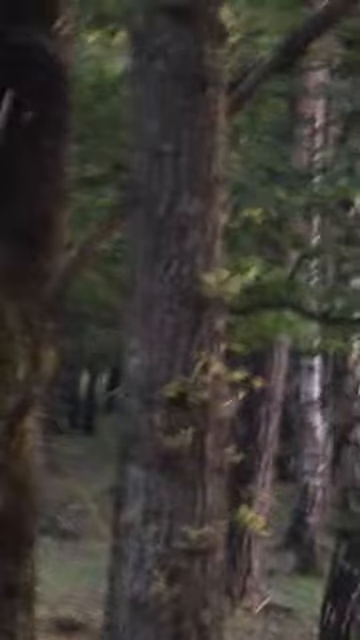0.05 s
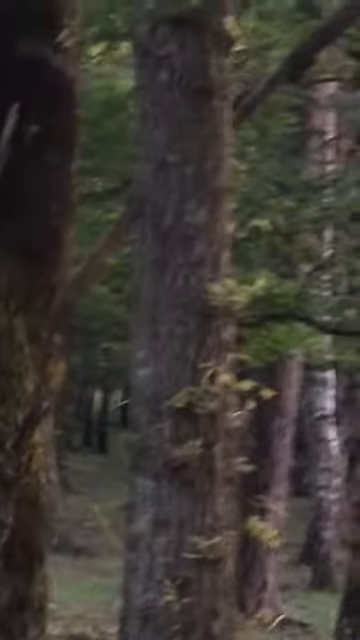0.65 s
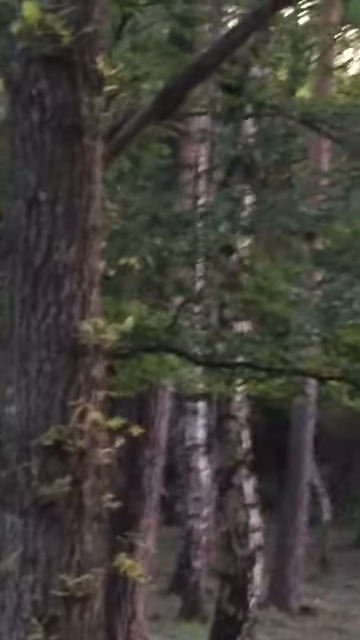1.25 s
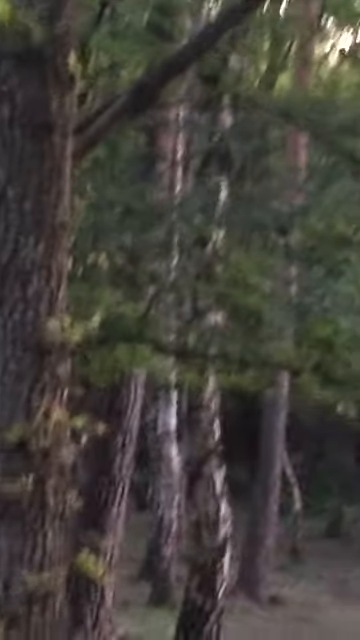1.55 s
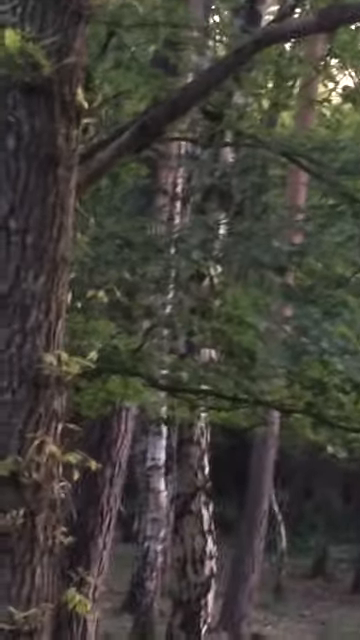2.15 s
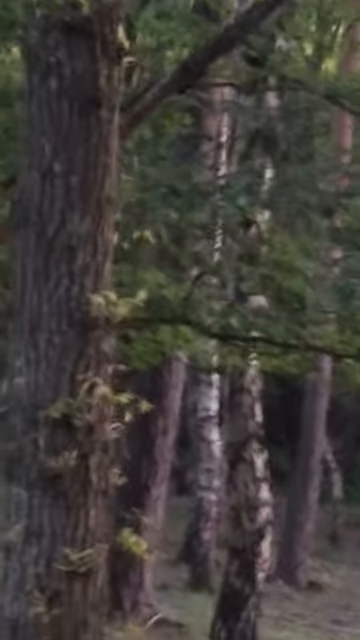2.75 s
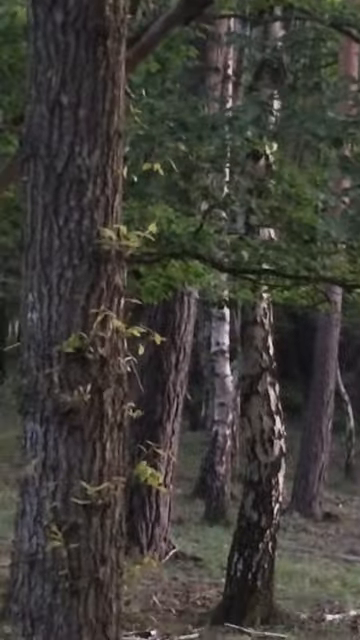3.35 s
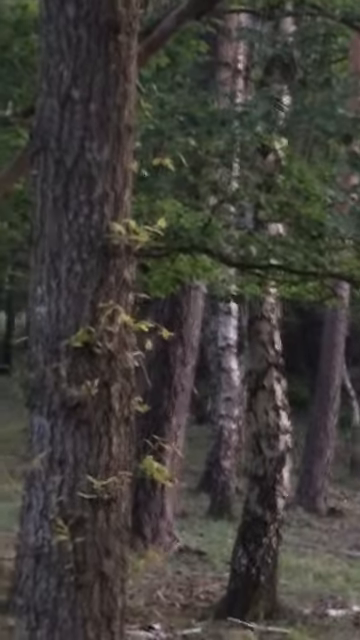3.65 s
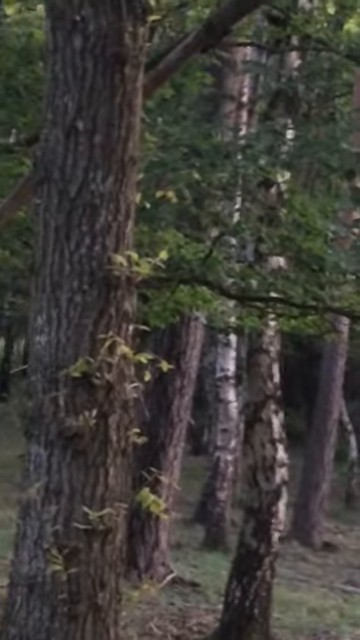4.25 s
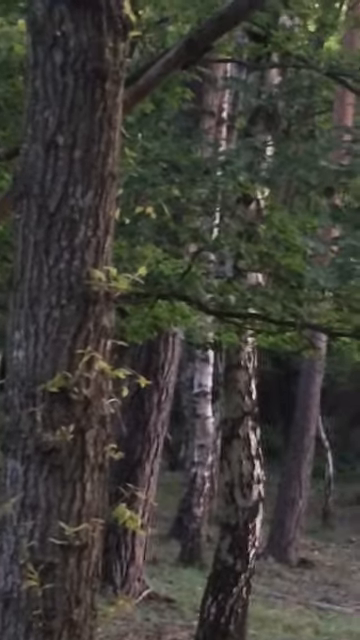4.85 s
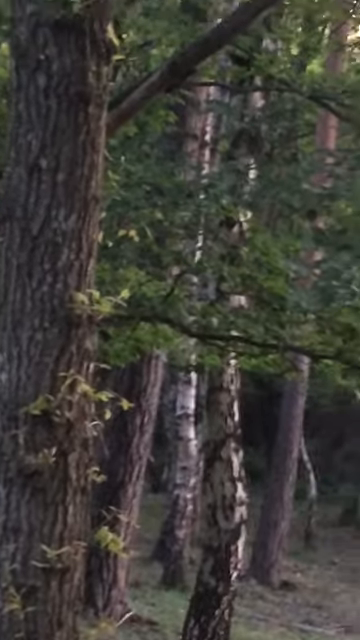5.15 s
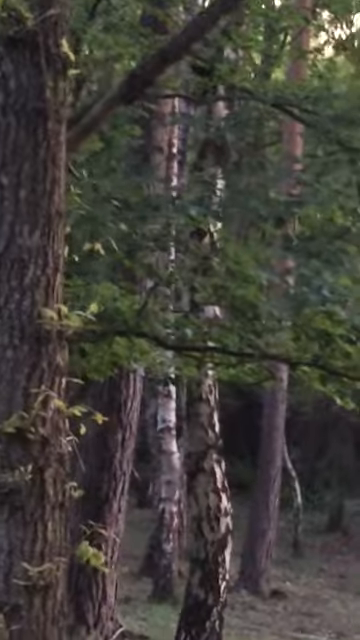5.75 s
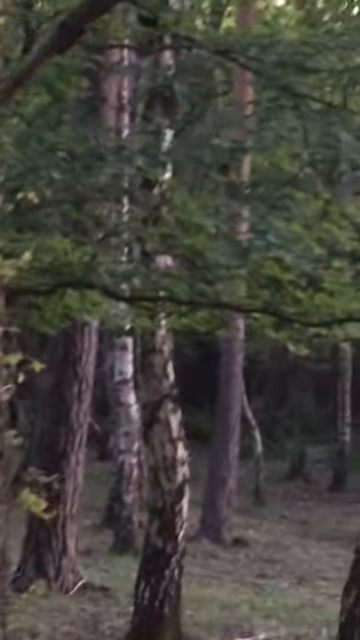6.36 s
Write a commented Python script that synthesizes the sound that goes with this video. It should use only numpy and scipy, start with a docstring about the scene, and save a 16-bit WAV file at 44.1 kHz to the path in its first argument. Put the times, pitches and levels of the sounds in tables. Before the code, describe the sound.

A deer squeaks once, high and echoing, after some close handling clicks, while small birds sing faintly far off.

```python
"""A deer's alarm squeak

In a quiet wood a deer squeaks once: its voice breaks upward, arches and falls away among echoing trunks.
Before that, fingers click and rub on a camera's housing; the hand that holds it makes soft, low bumps.
Small birds sing far off over a faint, distant rumble."""
import sys
import numpy as np
from scipy import signal
from scipy.fft import rfft, irfft, next_fast_len
from scipy.io import wavfile
from scipy.ndimage import map_coordinates

SR = 44100
rng = np.random.default_rng(int(sys.argv[2]) if len(sys.argv) > 2 else 0)


def digitize_waveform(pressure):
    """Quantize a signal to 16-bit integers and store it at the path in sys.argv[1].

    Rows of a 2-D input are taken as channels; values are limited to [-1, 1].
    """
    field = np.atleast_2d(pressure).T
    bounded = np.clip(field, -1, 1)
    quanta = np.round(bounded * 32767).astype(np.int16)
    wavfile.write(sys.argv[1], SR, quanta)


N = 291060

# how the far rumble rises and sinks: t/s, relative level/dB
RUMBLE_LEVELS = [(0, -63), (1.2, -65), (2.2, -64.5), (3.3, -63.5), (5.6, -63.5), (6.6, -64.5)]
# the tone colour of each noise: f/Hz, relative level/dB
RUMBLE_COLOUR = [(20, -15), (45, 3), (65, -2), (115, 2), (160, -7), (280, -10.5), (450, -5), (600, -8),
                 (720, -2.5), (1000, -11), (1400, -18), (2000, -24), (3200, -35), (7000, -54)]
HISS_COLOUR = [(1500, -11), (3000, 2), (6000, 1), (10000, -3), (15000, -4)]
SCUFF_COLOUR = [(60, 7.5), (170, 2), (300, -9), (700, -36), (2000, -74)]  # skin shifting on the camera
SKIN_COLOUR = [(600, -13), (2200, 5.5), (4000, 3), (6000, 0), (8000, 0), (13000, -0.5), (15500, -5)]  # a sliding fingertip
SNAP_COLOUR = [(300, -21), (600, -18.5), (1200, -7.5), (1800, -6), (2700, -12), (3600, 0.5), (4900, 0.5),
               (5600, -8.5), (6300, -2), (8300, -1), (10000, -12), (13000, -10), (15500, -20)]  # a finger click
HOLLOW_COLOUR = [(400, -8.5), (900, -12.5), (1600, -3.5), (2400, 1.5), (3200, -11), (5000, -8.5),
                 (9000, -24.5), (15000, -24)]  # the housing's many small resonances
RASP_COLOUR = [(900, -13), (1400, -17), (2500, -5.5), (3200, 16), (4000, -41), (5000, -12), (5600, -11.5),
               (6700, 5), (8500, -28), (10000, -27.5), (15000, -35.5)]  # air in the deer's throat

# how long the wood echoes (t60 is the time to fade by 60 dB): f/Hz, t60/s
ECHO_TIMES = [(500, 0.96), (2500, 1.6), (3300, 1.49), (6500, 0.78), (13000, 1)]
# how well the wood returns sound: f/Hz, gain/dB
ECHO_COLOUR = [(1200, 7.5), (2450, 3.5), (3200, -3), (5000, 6.5), (6600, 5), (10000, -0.5)]

# far warbles and single bird whistles: t/s, length/s, start f/Hz, end f/Hz, level/dB
WARBLES = [(0, .25, 3980, 4230, -79), (1.081, 0.97, 3750, 3255, -78), (3.299, 0.1, 6980, 5980, -83.5),
           (3.45, 0.087, 6650, 6720, -75), (3.75, 0.13, 3200, 2970, -70), (6.331, 0.23, 3870, 3830, -72)]
BIRD_WHISTLES = [(3.574, 0.052, 6000, 3950, -72.5), (3.64, .057, 4000, 3340, -76),
                 (3.704, 0.038, 2670, 2750, -73), (4.873, 0.044, 2920, 2844, -64.5),
                 (5.261, 0.069, 2705, 2900, -70.5), (5.425, 0.057, 5500, 3990, -72.5),
                 (5.666, 0.036, 2720, 2545, -70.5), (5.706, 0.061, 2884, 2750, -67.5),
                 (5.89, 0.052, 4180, 4120, -64.5)]
# a songbird's three syllables: t/s into the syllable, f/Hz, relative level/dB
LILT = [(0, 3800, -11), (.022, 3950, 5), (.048, 4250, -3), (.061, 4400, -22), (.073, 4350, -1),
        (.093, 3430, 7.5), (.125, 2850, -3)]
UPSWEEP = [(0, 2866, -4), (.07, 3270, -1), (.09, 3750, 0), (.104, 4320, 3.5), (.125, 4290, -4),
           (.145, 4150, -12.5)]
SLUR = [(0, 3480, -6), (.025, 3517, 4.5), (.08, 3350, 0), (.13, 3000, -6)]
# the syllables in the order they are sung, each repeated before the next
SONG = [LILT] * 4 + [UPSWEEP] * 2 + [SLUR] * 2

# dull knocks, damped if the finger stays on: t/s, level/dB, treble tilt/dB per octave, damping t60/s
KNOCKS = [(0.411, -32.5, -10, 0.16), (0.5034, -43, 6, 2.7), (2.779, -45.5, 0, 0.042)]
# the low tones of the camera's body: f/Hz, relative level/dB, t60/s
BODY_TONES = [(164, -1, .1), (217.3, -10, 0.98), (251, -4, .11), (385, -13, .4), (442.3, -3, 0.07),
              (576, 0.5, 0.024)]
# soft bumps of the hand: t/s, f/Hz, level/dB
BUMPS = [(2.285, 71, -49.5), (2.617, 49.4, -46), (2.665, 76.3, -39.5), (3.128, 83.3, -42),
         (3.431, 61.7, -41.5), (3.491, 115.6, -37.5), (4.176, 80, -45.5), (4.227, 62.7, -47.5),
         (5.372, 83.5, -42), (5.437, 68, -46), (5.486, 84, -39), (5.504, 104, -35.5), (5.578, 75, -47.5),
         (6.075, 79, -51)]
# finger strokes that start quickly and die away: t/s, t60/s, level/dB
STROKES = [(0.41, 0.2, -45), (0.49, 0.63, -65), (0.608, 0.24, -65.5), (0.688, 0.71, -54),
           (0.712, 0.19, -48), (0.76, 0.26, -59), (0.949, 0.28, -61.5), (1.142, 0.48, -61.5),
           (1.275, 0.36, -68), (1.385, 0.39, -66.5)]
# a fingertip sticks and slips, one row per tone: t/s, length/s, f/Hz, level/dB
CREAKS = [(0.7145, .014, 3400, -44.5), (0.7155, .017, 2510, -38), (0.758, .011, 4030, -43),
          (0.864, .0085, 3850, -53)]
# sharp finger clicks on the housing, each with its own loudness and brightness:
# t/s, level/dB, treble tilt/dB per octave
CLICKS = [(0.4091, -21.5, -1.5), (0.4106, -19, 1), (0.436, -31, -4), (0.504, -47.5, -1), (0.565, -53, -1),
          (0.717, -37, 7), (0.7572, -40, -4), (0.7602, -32.5, -5), (0.764, -41.5, -6), (0.799, -45, -13.5),
          (0.8665, -49.5, -5.5), (1.07, -59, -2), (1.1489, -49, 15), (1.1968, -50, 15),
          (1.4736, -53.5, -1.5), (1.5535, -58.5, 4), (1.744, -64, 6.5), (2.002, -57.5, -3)]
# the high tones of the housing: f/Hz, relative level/dB, t60/s
HOUSING_TONES = [(940, -4.5, .16), (1304, -5, .11), (1645, -2.5, 0.16), (1856, -8, .09), (2080, 4.5, 0.12),
                 (2508, -5.5, 0.24), (2901, -4.5, .17), (3500, -3.5, .13), (4027, -7.5, 0.19),
                 (4470, -5.5, 0.12), (4500, -6, .13), (4942, -5, 0.085), (6000, -18.5, .07),
                 (7660, -2.5, .064)]

# the deer's overtones: multiple of the pitch, relative level/dB in the onset, and in the whistle
OVERTONES = [(2, -20, -19), (3, -24.5, -34.5), (4, -39.5, -52)]
# low catches in its failing voice: t/s, length/s, f/Hz, level/dB
CROAKS = [(4.355, .012, 2090, -48.5), (4.370, .013, 1349, -49.5)]

CALL_S = 4.21  # when the deer starts
BREAK_S, CREST_S, GIVE_OUT_S = .0215, .067, .122  # from then: its voice jumps up, peaks, gives out
JITTER = .003  # its slight, constant unsteadiness, as a share of the pitch


def amp(db):
    """Turn decibels into a factor to multiply by."""
    return 10 ** (np.asarray(db) / 20)


def unit(x):
    """Scale a sound to an average power of 1."""
    return x / np.sqrt(np.mean(x ** 2) + 1e-20)


def along(points, hz):
    """Read between the rows of a (frequency, value) table, on a log frequency axis."""
    freqs, values = np.transpose(points)
    return np.interp(np.log(hz + 1), np.log(freqs + 1), values)


def curves(rows):
    """Turn each column after the time into one value per sample."""
    times, *columns = np.transpose(rows)
    return [np.interp(np.arange(N) / SR, times, column) for column in columns]


def wobble(rate):
    """A smooth random curve through `rate` points a second."""
    points = rng.standard_normal(int(N * rate / SR) + 4)
    return map_coordinates(points, [np.arange(N) * rate / SR])


def filtered(x, response):
    """Scale each frequency in a sound by response(hz)."""
    size = next_fast_len(len(x) + 8192)
    return irfft(rfft(x, size) * response(np.fft.rfftfreq(size, 1 / SR)), size)[:len(x)]


def noise(colour, size, tilt_db=0):
    """Coloured noise of power 1, its treble tilted by tilt_db per octave."""
    def response(hz):
        return amp(along(colour, hz) + tilt_db * np.log2(np.maximum(hz, 1500)))
    return unit(filtered(rng.standard_normal(size), response))


def fade(t, t60):
    """Die away by 60 dB every t60 seconds."""
    return np.exp(-np.log(1000) * t / t60)


def add(track, s, sound):
    """Mix a sound in at s seconds."""
    start = max(round(s * SR), 0)
    track[start:start + len(sound)] += sound[:max(N - start, 0)]


def whistle(pitch, waver, rate):
    """A pure tone that strays from its pitch by the share `waver`, `rate` times a second."""
    position = np.arange(len(pitch)) * rate / SR
    unsteady = 1 + waver * map_coordinates(rng.standard_normal(1024), [position], mode="wrap")
    return np.sin(2 * np.pi * np.cumsum(pitch * unsteady) / SR)


def trunks(x, spread_s, count):
    """Each tree trunk throws back a weak, slightly dull copy of the sound."""
    distance, strength = rng.random(count), rng.standard_normal(count)
    delays = (SR * (.004 + spread_s * distance)).astype(int)
    echoes = np.bincount(delays, strength * np.exp(-2 * distance))
    returned = signal.fftconvolve(x, echoes / np.linalg.norm(echoes))[:N]
    return filtered(returned, lambda hz: 1 / np.hypot(1, hz / 9000))


def forest(x):
    """The deep wood's smooth wash of echo; the treble dies first."""
    hz, t, bands = signal.stft(rng.standard_normal(2 * SR), SR, nperseg=256)
    dying = fade(t, along(ECHO_TIMES, hz)[:, None]) * (1 - np.exp(-t / .005))
    tail = signal.istft(bands * dying * amp(along(ECHO_COLOUR, hz))[:, None], SR, nperseg=256)[1]
    return signal.fftconvolve(x, tail / np.linalg.norm(tail))[:N]


def background():
    """A distant rumble drifts through the trees, with a faint, even hiss."""
    level_db, = curves(RUMBLE_LEVELS)
    rumble = amp(level_db + 3 + .56 * wobble(5.1)) * noise(RUMBLE_COLOUR, N)
    return rumble + amp(-78.5) * noise(HISS_COLOUR, N)


def warbling_birds(flutter_db=3.5):
    """Quick warbling from deep in the wood comes and goes, and arrives only as echo."""
    song = np.zeros(N)
    for s, length, start_hz, end_hz, db in WARBLES:
        pitch = np.linspace(start_hz, end_hz, int(length * SR))
        level = amp(db) * signal.windows.tukey(len(pitch), .3)
        add(song, s, level * whistle(pitch, waver=.06, rate=45))
    return forest(song * amp(flutter_db * wobble(18)))


def whistling_birds():
    """Thin whistles glide fast and then level off, half lost in their echo."""
    notes = np.zeros(N)
    for s, length, start_hz, end_hz, db in BIRD_WHISTLES:
        progress = np.linspace(0, 1, int(length * SR))
        pitch = end_hz + (start_hz - end_hz) * (1 - progress) ** 2
        level = amp(db) * np.sqrt(np.abs(np.sin(np.pi * progress)))
        add(notes, s, level * whistle(pitch, waver=.014, rate=320))
    return notes + amp(-5) * trunks(notes, spread_s=.08, count=60) + amp(-1.5) * forest(notes)


def songbird(start_s=5.044, period_s=.216, rise_db_per_s=13, echo_share=.35):
    """One bird sings its syllables at a steady pace, growing louder, blurred by the trees."""
    song = np.zeros(N)
    for k, syllable in enumerate(SONG):
        size = int(syllable[-1][0] * SR)
        pitch, shape_db = [curve[:size] for curve in curves(syllable)]
        elapsed = k * period_s
        db = min(-79.5 + rise_db_per_s * elapsed, -67)
        level = amp(db + shape_db) * signal.windows.tukey(size, .1)
        add(song, start_s + elapsed, level * whistle(pitch, waver=.0093, rate=360))
    echo = trunks(song, spread_s=.06, count=60)
    return np.sqrt(1 - echo_share) * song + np.sqrt(echo_share) * echo + amp(-5) * forest(song)


def hand_bumps():
    """Knocks ring low in the camera's body; shifts of the grip rock it gently with a dull scuff."""
    out, t = np.zeros(N), np.arange(SR // 2) / SR
    for s, db, tilt_db, damping in KNOCKS:
        ring = sum(amp(tone_db + tilt_db * np.log2(hz / 260)) * fade(t, t60) * np.sin(2 * np.pi * hz * t)
                   for hz, tone_db, t60 in BODY_TONES)
        add(out, s, amp(db) * (1 - np.exp(-t / .0018)) * fade(t, damping) * ring)
    for s, hz, db in BUMPS:
        width = .7 / hz  # half a bump lasts less than one cycle
        t = np.arange(-5 * width, 5 * width, 1 / SR)
        push = np.exp(-(t / width) ** 2) * np.cos(2 * np.pi * hz * t)
        scuff = amp(-18) * np.exp(-(t / (2.3 * width)) ** 2) * noise(SCUFF_COLOUR, len(t))
        add(out, s + t[0], amp(db) * (push + scuff))
    return out


def finger_rubs(settle_s=1.27, slips_per_s=220):
    """Skin slides over the housing in a hiss of tiny slips, and now and then catches and creaks."""
    t = np.arange(N) / SR
    grip_db = -80 - 19 * np.maximum(t - settle_s, 0)  # the rustle fades as the hand settles
    power = amp(grip_db) ** 2 + amp(-91) ** 2  # even a still hand rustles a little
    t = t[:SR // 2]
    for s, t60, db in STROKES:
        stroke = amp(db) * (1 - np.exp(-t / .0043)) * fade(t, t60)
        add(power, s, stroke ** 2)
    slips = (rng.random(N) < slips_per_s / SR) * amp(3.55 * rng.standard_normal(N))
    crackle = unit(filtered(slips, lambda hz: amp(along(SKIN_COLOUR, hz))))
    hiss = unit(noise(SKIN_COLOUR, N) * amp(2.5 * wobble(500)))
    out = np.sqrt(power) * (amp(1) * hiss + amp(-5.5) * crackle)
    t = t[:SR // 8]
    for s, length, hz, db in CREAKS:
        pitch = hz * (1 + .023 * wobble(880)[:len(t)] * (t < length))
        shape = (1 - np.exp(-t / .00073)) * (np.exp(-(t / length) ** 4) + amp(-2.5) * fade(t, .13))
        add(out, s, amp(db - .5) * shape * np.sin(2 * np.pi * np.cumsum(pitch) / SR))
    return out


def finger_clicks():
    """Each click is a sharp snap with a short chatter that leaves the housing ringing."""
    out, t = np.zeros(N), np.arange(SR // 3) / SR
    for s, db, tilt_db in CLICKS:
        tones = sum(
            amp(tone_db + rng.normal(0, 1)) * fade(t, t60) * np.sin(2 * np.pi * (hz * t + rng.random()))
            for hz, tone_db, t60 in HOUSING_TONES)
        ring = amp(-23) * tones + amp(-17.5) * noise(HOLLOW_COLOUR, len(t)) * fade(t, .087)
        ring *= amp(-4 - 1.5 * tilt_db)  # duller clicks put more into the ring
        chatter_s = .034 * 2 ** ((db + 35) / 33)  # louder ones chatter longer
        shape = amp(1) * fade(t, .0038) + amp(-9.5) * fade(t, chatter_s)
        snap = shape * noise(SNAP_COLOUR, len(t), tilt_db)
        add(out, s, amp(db) * (1 - np.exp(-t / .000079)) * (snap + ring))
    return out


def deer_onset(t, broken, flutter, start_hz=2396, bend_hz=166.2):
    """A pressed, reedy tone swells, bends up and brightens with effort, then hangs on hoarsely."""
    effort, since_break = np.clip(t / BREAK_S, 0, 1), np.maximum(t - BREAK_S, 0)
    pitch = start_hz + bend_hz * effort ** 3 * (1 - .5 * broken)
    jitter = JITTER + .012 * broken
    phase = 2 * np.pi * np.cumsum(pitch * (1 + jitter * wobble(1200))) / SR
    overtones = amp(-4.5 + 8 * effort) * sum(amp(db) * np.sin(k * phase) for k, db, _ in OVERTONES)
    swell = np.clip(t / .0031, 0, 1) * amp(-44.5 + 14 * effort ** 1.5)
    linger = 1 - broken + broken * amp(-17.5) * fade(since_break, .31)
    return swell * linger * np.sqrt(2) * (np.sin(phase) + flutter * overtones)


def deer_whistle(t, broken, flutter, crest_hz=3299, climb_hz=309.5, sag_hz=302.5):
    """An arching whistle, brightest at its crest, with air rasping past the vocal folds."""
    since_break, spent = np.maximum(t - BREAK_S, 0), np.maximum(t - GIVE_OUT_S, 0)
    hoarse = fade(since_break, .032)  # roughest just after the break
    arch = np.where(t < CREST_S, climb_hz / (CREST_S - BREAK_S) ** 2,
                    sag_hz / (GIVE_OUT_S - CREST_S) ** 2)
    drop_hz = arch * (t - CREST_S) ** 2
    pitch = np.maximum(crest_hz - drop_hz, 0)
    jitter = JITTER + .012 * hoarse + .025 * np.minimum(spent / .015, 1)  # shakier as the voice fails
    phase = 2 * np.pi * np.cumsum(pitch * (1 + jitter * wobble(1200))) / SR
    dull_db = -15 * (1 - np.exp(-drop_hz / 107))
    overtones = amp(dull_db) * sum(amp(db) * np.sin(k * phase) for k, _, db in OVERTONES)
    rasp = amp(-31.5 + 10 * hoarse) * noise(RASP_COLOUR, N)
    puff = amp(-29) * noise(HISS_COLOUR, N) * fade(since_break, .012)  # air bursts through at the break
    level = broken * amp(-29 - 1200 * spent)
    return level * (np.sqrt(2) * (np.sin(phase) + flutter * overtones) + rasp + puff)


def deer():
    """The reedy onset cracks up into a whistle and gives out in two croaks; the wood echoes it."""
    t = np.arange(N) / SR - CALL_S
    broken = .5 + .5 * np.tanh((t - BREAK_S) / .00056)  # 0 before the voice breaks, 1 after
    flutter = amp(2.2 * wobble(600))  # the vocal folds close unevenly, so the overtones flutter
    voice = deer_onset(t, broken, flutter) + deer_whistle(t, broken, flutter)
    for s, length, hz, db in CROAKS:
        progress = np.linspace(0, 1, int(length * SR))
        pitch = hz * (1 - .16 * (progress - .5))
        level = amp(db) * np.sqrt(2 * np.abs(np.sin(np.pi * progress)))
        add(voice, s, level * whistle(pitch, waver=.094, rate=1160))
    return voice + amp(-9) * trunks(voice, spread_s=.13, count=90) + amp(-15) * forest(voice)


def scene():
    """The animals, the hand on the camera and the far rumble, mixed into one channel."""
    animals = deer() + songbird() + whistling_birds() + warbling_birds()
    handling = finger_clicks() + finger_rubs() + hand_bumps()
    return (animals + handling + background())[None]


def record(dry):
    """The camera keeps nothing above 15500 Hz."""
    return filtered(dry[0], lambda hz: hz < 15500)[None]


dry = scene()
out = record(dry)
digitize_waveform(out)
```